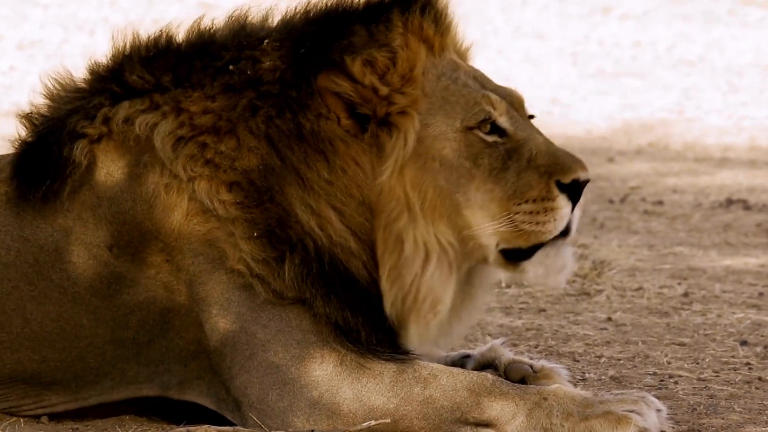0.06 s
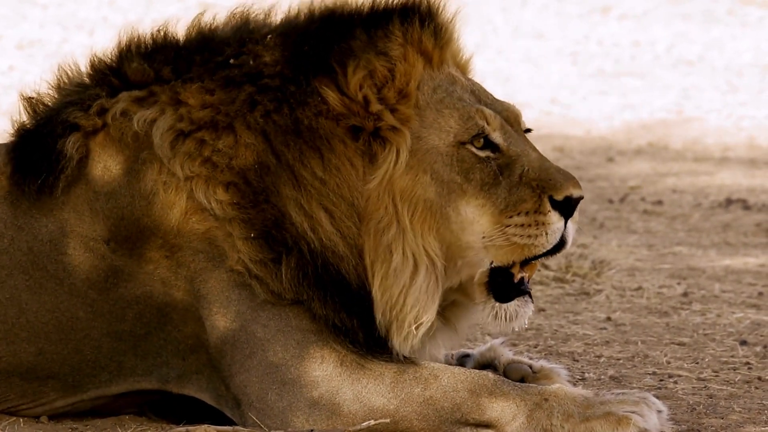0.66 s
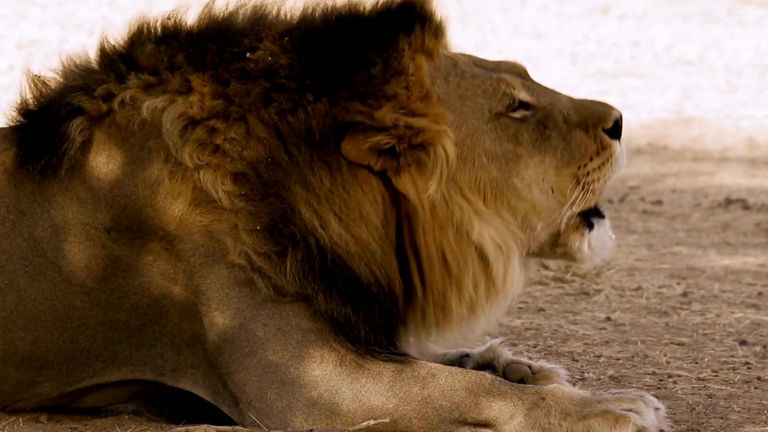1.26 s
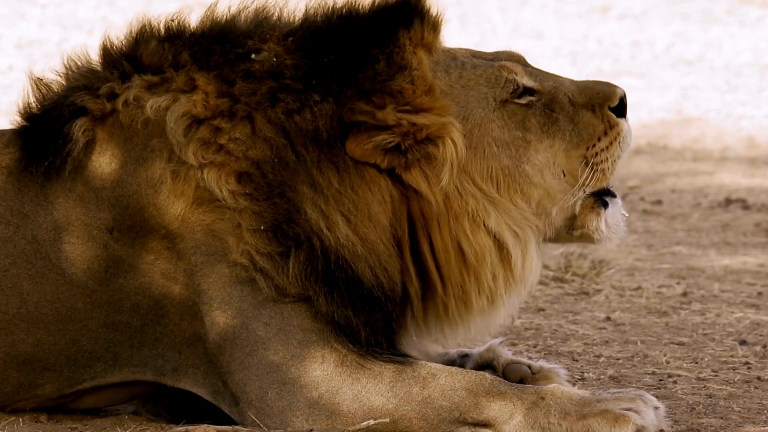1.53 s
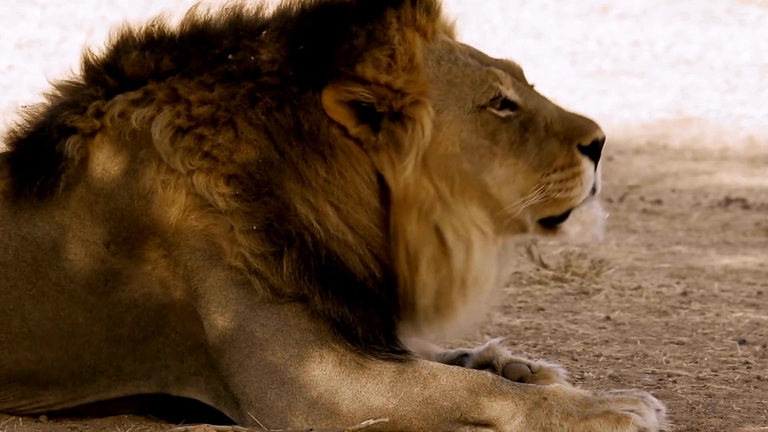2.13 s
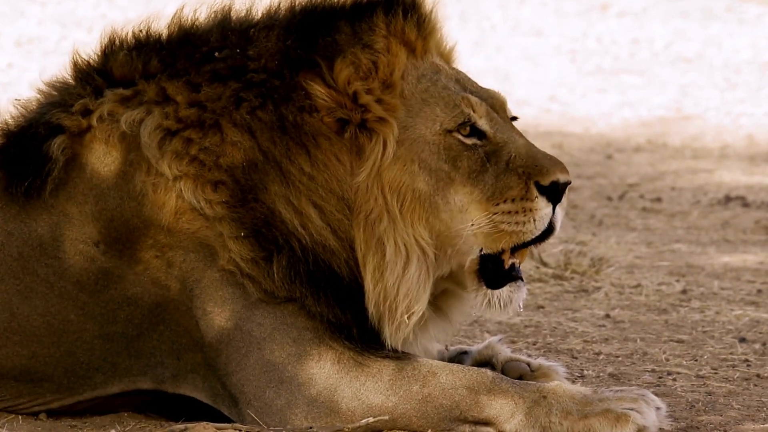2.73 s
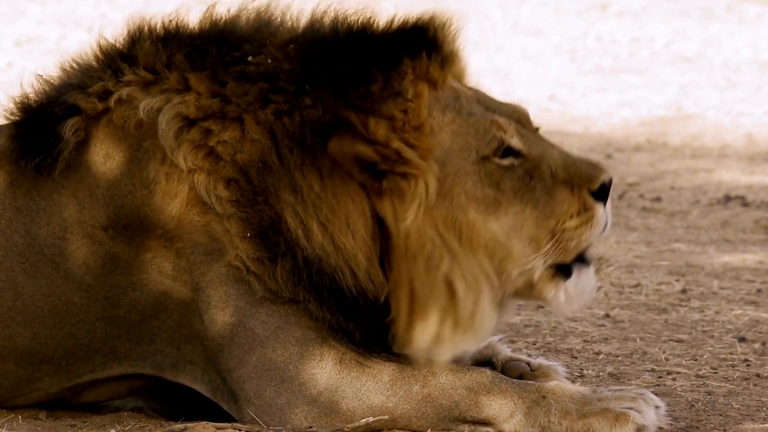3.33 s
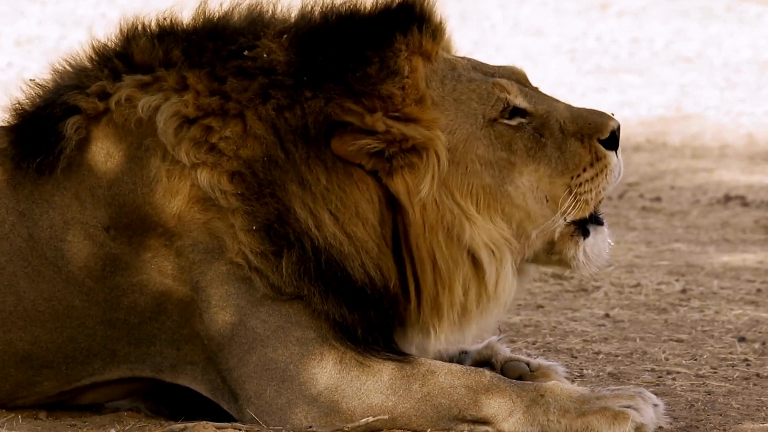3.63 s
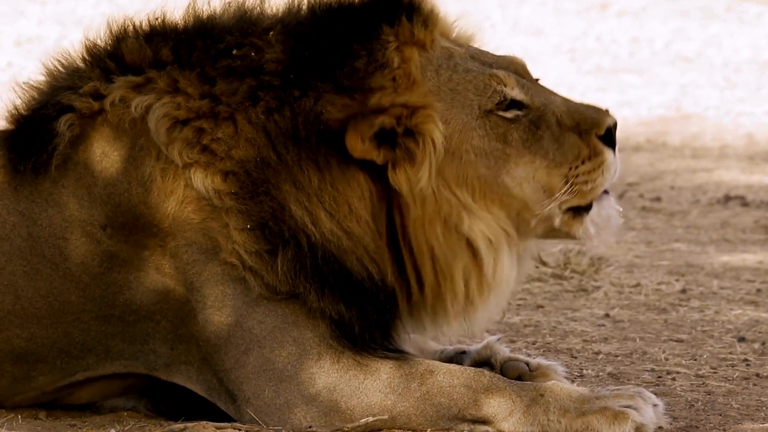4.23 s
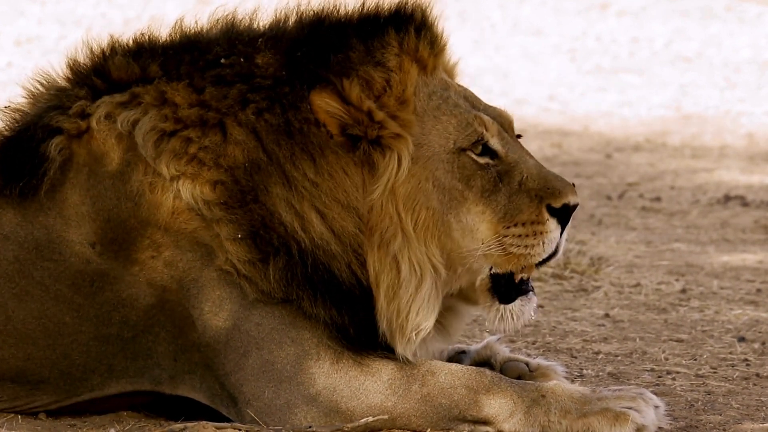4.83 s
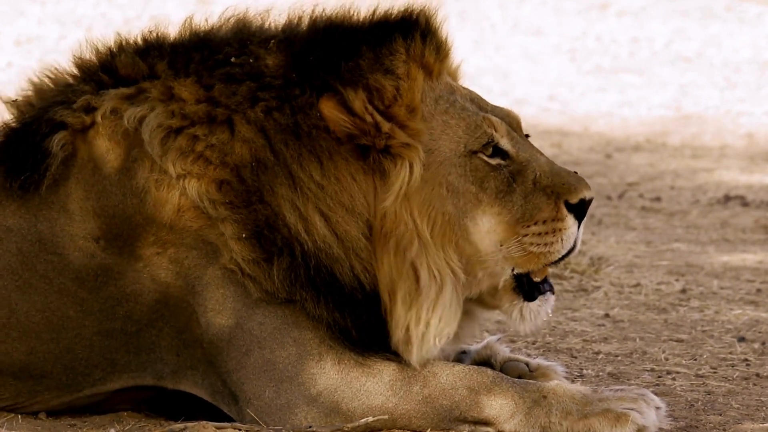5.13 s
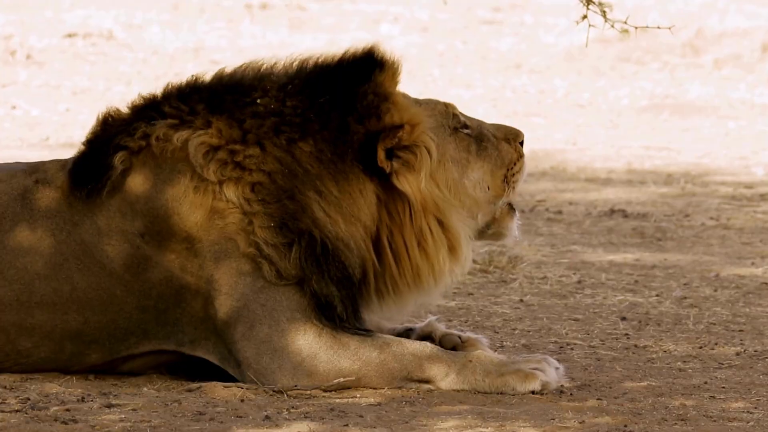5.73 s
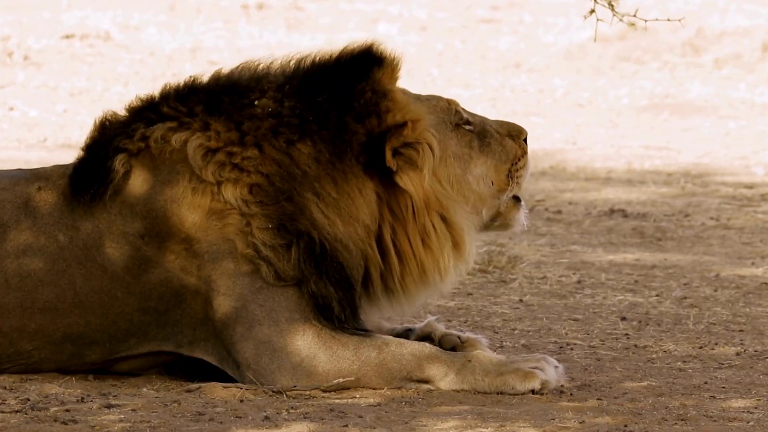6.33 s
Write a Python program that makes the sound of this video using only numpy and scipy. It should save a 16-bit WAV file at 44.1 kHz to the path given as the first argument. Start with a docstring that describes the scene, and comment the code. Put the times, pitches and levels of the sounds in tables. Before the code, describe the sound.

A steady hush of outdoor air with a low wind rumble runs throughout. From the start, songbirds slightly to the left whistle and twitter in short repeated syllables, echoing lightly among trees, while fainter birds call far off. At about 1 second a close, central lion gives a deep, moaning roar lasting a second: it starts clean, tightens, turns hoarse and sinks. A bird adds one quick rising trill at 2.5 seconds, then the song thins out. The second roar runs from 3.3 to 4.4 seconds, briefly cracking into a higher tone midway. Two soft, low thumps come at about 4.8 and 5.4 seconds, and the birds pick up again with quick chirps. The third roar, slightly lower, begins at 5.5 seconds and fades by about 6.5, with one short dry click just after it starts.

```python
"""Open ground among trees: a lying lion gives three deep, moaning roars over a steady hush of air.
Its heavy vocal folds pulse into a long throat; each roar starts clean, tightens, turns hoarse, sinks.
Songbirds whistle short repeated syllables and one rising trill; fainter birds call far off.
Leaves and trunks scatter the song. Two soft low thumps precede the last roar; a click falls within it."""
import sys
import numpy as np
from scipy import signal
from scipy.fft import rfft, irfft
from scipy.io import wavfile
from scipy.ndimage import uniform_filter1d

SR = 44100
rng = np.random.default_rng(int(sys.argv[2]) if len(sys.argv) > 2 else 0)


def log_audio(samples):
    """Write samples as a 16-bit WAV file to the path given in sys.argv[1]."""
    # one column per channel
    frames = np.atleast_2d(samples).T
    # limit to full scale, then quantise
    limited = np.clip(frames, -1, 1)
    pcm = np.round(limited * 32767).astype(np.int16)
    wavfile.write(sys.argv[1], SR, pcm)


N = 285768

# Air spectrum: freq_hz, level_db
AIR_SPECTRUM = [(15, -36), (25, -12), (48, 5), (126, -10), (305, -13), (509, -11), (567, -11.5), (722, -9),
                (945, -7), (2420, -22), (2700, -22), (3340, -23), (5140, -26.5), (8350, -35.5),
                (15500, -43)]
# Left-right likeness of the air: freq_hz, correlation
AIR_CORRELATION = [(60, 0.78), (240, 0.89), (950, 0.85), (3770, 0.58), (15000, 1)]
# Bird notes by shape: length_s, start_ratio, end_ratio (to the pitch a third in), swell_db, waver_ratio
NOTE_SHAPES = {"hook": (.088, 1.46, .91, -2, .012), "flick": (.02, 1.27, .92, 0, .012),
               "slide": (.028, 1.2, .77, -2, .012), "swoop": (.046, 1.44, .75, 0, .012),
               "lift": (.028, .85, 1.03, 7, .012), "rise": (.025, .85, 1.2, 2, .018),
               "arch": (.028, .74, .7, -5, .022), "pip": (.026, 1.06, .97, 0, .01),
               "dive": (.024, 1.42, .82, 1, .03), "climb": (.044, .84, 1.3, 2, .045),
               "buzz": (.036, 1, 1, -2, .065)}
# One syllable repeated: start_s, repeats, spacing_s, shape, ending, first_hz, last_hz, first_db, last_db
BIRD_PHRASES = [(0, 1, 0, "pip", "none", 2290, 2290, -20, -18.5),
                (.085, 2, .03, "pip", "none", 2350, 2345, -22, -20),
                (0.078, 2, 0.18, "rise", "none", 4070, 4510, -32.5, -32.5),
                (0.061, 2, .088, "pip", "none", 5800, 5650, -45, -35),
                (0.318, 3, 0.18, "lift", "twitter", 4100, 3860, -29, -23.5),
                (.375, 2, 0.13, "hook", "none", 2390, 2456, -20, -21.5),
                (.828, 2, .147, "hook", "none", 2458, 2480, -20, -20.5),
                (.839, 3, 0.14, "lift", "twitter", 3550, 3360, -23.5, -26),
                (1.232, 5, .04, "slide", "none", 3350, 3690, -27, -24.5),
                (1.345, 2, 0.14, "hook", "none", 2410, 2440, -20.5, -22),
                (1.504, 2, 0.16, "lift", "drop", 4270, 4090, -23, -23),
                (1.736, 1, 0, "hook", "none", 2240, 2250, -28, -38),
                (1.922, 2, .135, "dive", "upturn", 4910, 4470, -27, -28.5),
                (2.195, 2, .085, "rise", "scold", 5030, 4540, -30, -26),
                (2.39, 1, 0.35, "slide", "none", 2800, 3020, -32.5, -35),
                (3.945, 5, .042, "buzz", "none", 2390, 2780, -43, -47),
                (5.133, 2, 0.12, "slide", "none", 4600, 4800, -47, -41.5),
                (5.352, 7, 0.069, "arch", "chip", 4360, 3975, -36, -29),
                (5.779, 7, .045, "buzz", "none", 5850, 5650, -47, -51),
                (5.959, 2, 0.063, "slide", "none", 3500, 3210, -31, -28.5),
                (5.987, 1, 0, "climb", "none", 4030, 3950, -32, -33),
                (6.113, 3, 0.16, "swoop", "hiccup", 4200, 4080, -27, -23.5)]
# Notes after a syllable's lead note, by ending: delay_s, shape, pitch_hz, relative_db
SYLLABLE_ENDINGS = {"none": [], "twitter": [(.033, "flick", 4480, 1), (.112, "buzz", 5580, -8.5),
                    (.107, "slide", 3950, -6.5)], "drop": [(.029, "swoop", 3220, 0.5)],
                    "upturn": [(.034, "climb", 2750, 3)], "scold": [(.004, "buzz", 5360, -2),
                    (.017, "dive", 4824, 3)], "chip": [(.071, "flick", 4970, -6.5)],
                    "hiccup": [(.103, "slide", 4400, -2), (.119, "lift", 4870, -4)]}
# Rising trill: time_s, pitch_hz, level_db
TRILL_COURSE = [(2.475, 1896, -36.5), (2.51, 2750, -26), (2.544, 3476, -24), (2.6, 3926, -22.5),
                (2.648, 4070, -27), (2.66, 4100, -47)]
# Echo decay in the trees: freq_hz, t60_s
TREE_DECAY = [(2500, 2.26), (4000, 1.26), (6000, 1.35), (13000, .7)]
# Scattering by leaves: freq_hz, gain_db
LEAF_SCATTER = [(2200, -4), (3200, 2.5), (5000, -1), (11000, 1.5)]
# Roars: start_s, slack_s, end_s, top_hz, max_roughness, level_db, swell_db, tight_at_s, tight_s, loss_db
LION_ROARS = [(1.061, 1.697, 2.036, 160.2, 0.62, -13.5, 10.5, 1.55, 0.12, 13),
              (3.335, 3.982, 4.356, 159, 0.61, -13, 9.5, 3.79, 0.085, 27.5),
              (5.543, 6.258, 6.54, 138.5, 0.57, -12.5, 6, 5.945, 0.034, 8)]
# Surges of effort: centre_s, half_width_s, throat_db, added_roughness
EFFORT_SURGES = [(1.577, 0.011, 7, .03), (1.738, 0.028, 1.5, .04), (3.663, 0.016, 10, 0),
                 (3.879, .035, 3, 0.01), (4.012, 0.036, 2.5, .05), (4.289, 0.021, 5.5, 0),
                 (5.818, 0.019, 10.5, 0.05), (5.977, 0.022, 8, 0), (6.302, .04, 4.5, .3)]
# Valley below the first throat resonance: freq_hz, gain_db
THROAT_VALLEY = [(180, -13), (235, 6.5), (305, -5), (365, 2)]
# Throat resonances: centre_hz, width_hz, gain_db
THROAT_MODES = [(383.4, 94, 8), (494.3, 64, -5), (674, 64, -11.5), (766, 62, -14.5), (920, 94, -13.5),
                (1148, 28, -21.5)]
# Breath rasp spectrum: freq_hz, gain_db
RASP_SPECTRUM = [(200, -72), (700, -47), (1400, -28.5), (2000, -27), (3400, -29.5), (5000, -41),
                 (9000, -45), (10500, -72)]
# Second roar cracking into a higher register: time_s, pitch_hz, voice_share
CRACK_COURSE = [(3.695, 266, 0), (3.73, 265.6, 0.34), (3.8, 263, 0.55), (3.84, 260, 0.76), (3.86, 243, 0)]
# Cracked voice spectrum: harmonic, level_db
CRACK_HARMONICS = [(1, 9), (2, 8.5), (3, 9.5), (4, 5.5), (5, -28)]
# Low thumps: start_s, length_s, level_db
LOW_THUMPS = [(4.834, .11, -35), (5.36, .13, -36)]


def amp(db):
    """Decibels to gain."""
    return 10 ** (np.asarray(db) / 20)


def unit_rms(x):
    """Scales x to rms 1."""
    return x / np.sqrt(np.mean(x ** 2) + 1e-20)


def steady(x, span_s):
    """Holds short-time rms at 1."""
    size = int(span_s * SR)
    power = uniform_filter1d(uniform_filter1d(x ** 2, size), size)
    return x / np.sqrt(abs(power) + 1e-12)


def at_freq(table, hz):
    """Interpolates a table over log frequency."""
    freq_hz, value = np.transpose(table)
    return np.interp(np.log(hz + 1), np.log(freq_hz + 1), value)


def at_time(table, t):
    """Interpolates each column over time."""
    time_s, *columns = np.transpose(table)
    return [np.interp(t, time_s, column) for column in columns]


def colour(x, spectrum):
    """Filters x by a dB spectrum."""
    return irfft(rfft(x) * amp(at_freq(spectrum, np.fft.rfftfreq(len(x), 1 / SR))), len(x))


def wander(count, rate_hz):
    """Smooth random drift, rms about 1."""
    padded = count + SR // 4
    lowpass = np.exp(-(np.fft.rfftfreq(padded, 1 / SR) / rate_hz) ** 2)
    return unit_rms(irfft(rfft(rng.standard_normal(padded)) * lowpass))[:count]


def resonate(x, centre_hz, width_hz):
    """Unity-gain resonance, two equal pole pairs."""
    radius = np.exp(-np.pi * width_hz / SR)
    pole = radius * np.exp(2j * np.pi * centre_hz / SR)
    return 2 * signal.lfilter([(1 - radius) ** 2], [1, -2 * pole, pole ** 2], x).real


def ramp(t, start_s, length_s):
    """Linear rise, 0 to 1."""
    return np.clip((t - start_s) / length_s, 0, 1)


def bump(t, centre_s, half_width_s):
    """Gaussian of height 1."""
    return np.exp(-((t - centre_s) / half_width_s) ** 2)


def add(mix, start_s, sound):
    """Mixes sound in at start_s."""
    part = mix[round(start_s * SR):][:len(sound)]
    part += sound[:len(part)]


def pan(x, left_db):
    """Stereo, left louder by left_db."""
    return x * amp([[left_db / 2], [-left_db / 2]])


def open_air(level_db=-37.5):
    """Soft hush over low wind rumble, mostly alike in both ears."""
    left, other = rfft(rng.standard_normal((2, N)))
    alike = at_freq(AIR_CORRELATION, np.fft.rfftfreq(N, 1 / SR))
    right = alike * left + np.sqrt(1 - alike ** 2) * other
    hush = np.array([colour(irfft(side, N), AIR_SPECTRUM) for side in (left, right)])
    return amp(level_db + .35 * wander(N, rate_hz=4)) * unit_rms(hush)


def whistle(hz, octave_db=-42, third_db=-28, band_hz=12000, width_hz=1900):
    """Near-pure bird tone: faint octave, third harmonic in one high band only."""
    phase = 2 * np.pi * np.cumsum(hz) / SR
    third = amp(third_db) * np.exp(-((3 * hz - band_hz) / width_hz) ** 2)
    return np.sqrt(2) * (np.sin(phase) + amp(octave_db) * np.sin(2 * phase) + third * np.sin(3 * phase))


def chirp(shape, hz):
    """One wavering note: the pitch sweeps fast, then levels out."""
    length_s, start_ratio, end_ratio, swell_db, waver = NOTE_SHAPES[shape]
    count = int(length_s * SR)
    bend = np.polyfit(np.log1p([0, 2, 6]), np.log([start_ratio, 1, end_ratio]), 2)
    glide = np.exp(np.polyval(bend, np.log1p(np.linspace(0, 6, count))))
    envelope = amp(swell_db * np.linspace(-.5, .5, count)) * signal.windows.tukey(count, .26)
    return envelope * whistle(hz * glide * (1 + waver * wander(count, rate_hz=580)))


def songbirds(pitch_spread=.0079, spread_db=.7):
    """Evenly repeated syllables drifting in pitch and level; no two notes alike."""
    song = np.zeros(N)
    for start_s, repeats, spacing_s, lead, ending, first_hz, last_hz, first_db, last_db in BIRD_PHRASES:
        syllables = np.linspace((first_hz, first_db), (last_hz, last_db), repeats)
        for k, (lead_hz, lead_db) in enumerate(syllables):
            for delay_s, shape, hz, db in [(0, lead, lead_hz, .024)] + SYLLABLE_ENDINGS[ending]:
                detune, accent = rng.standard_normal(2)
                note = chirp(shape, hz * (1 + pitch_spread * detune))
                gain = amp(lead_db + db + spread_db * accent)
                add(song, start_s + k * spacing_s + delay_s, gain * note)
    return song


def far_birds(count=56, centre_hz=4300, floor_db=-40.5, range_db=6):
    """Faint notes at random times and pitches."""
    song = np.zeros(N)
    for k, (when, pick, height, loud) in enumerate(rng.random((count, 4))):
        shape = ["slide", "rise", "arch", "flick"][int(4 * pick)]
        note = chirp(shape, centre_hz * 2 ** (height - .5))
        add(song, (k + when) / count * N / SR, amp(floor_db + range_db * loud) * note)
    return song


def tree_echoes(song, near_s=.027, near_db=-4.5, tail_db=-4, width=.35):
    """Leaves and trunks scatter song into random-phase echoes: near ones, then a thin tail."""
    hz, t, spectra = signal.stft(song, SR, nperseg=512, noverlap=384)
    lag_s = t[None, :400]
    near = np.exp(-lag_s / near_s) * (lag_s > t[1])
    tail = amp(-60 * lag_s / at_freq(TREE_DECAY, hz)[:, None]) ** 2 * (lag_s > t[3])
    echoes = amp(near_db) ** 2 * near / near.sum() + amp(tail_db) ** 2 * tail / tail.sum(1, keepdims=True)
    power = abs(signal.fftconvolve(abs(spectra) ** 2, echoes, axes=1)[:, :len(t)])
    magnitude = np.sqrt(power) * amp(at_freq(LEAF_SCATTER, hz)[:, None])
    phases = np.exp(2j * np.pi * rng.random((2, *power.shape)))
    mid, side = 2 * signal.istft(magnitude * phases, SR, nperseg=512, noverlap=384)[1][:, :N]
    return np.array([mid + width * side, mid - width * side])


def effort(t, start_s, slack_s, end_s, top_hz, max_roughness, level_db, swell_db,
           tight_at_s, tight_s, loss_db):
    """One roar's course: pitch climbs and holds, then sinks and fades as the folds slacken."""
    start_hz, rise_hz_per_s, end_hz, min_roughness = 120.36, 140, 100.7, .227
    slack = ramp(t, slack_s, end_s - slack_s)
    hoarse = ramp(t, start_s + .15, length_s=.3654)
    accent = bump(t, start_s + .044, half_width_s=.11)  # louder, rougher, brighter opening
    surge_db = sum(db * bump(t, at_s, half_s) for at_s, half_s, db, _ in EFFORT_SURGES)
    surge_rough = sum(added * bump(t, at_s, half_s) for at_s, half_s, _, added in EFFORT_SURGES)
    rough = min_roughness + (max_roughness - min_roughness) * hoarse + surge_rough + .071 * accent

    taut_hz = np.minimum(start_hz + rise_hz_per_s * (t - start_s), top_hz)
    hz = taut_hz * (1 - slack) + end_hz * slack + 24.7 * surge_rough
    hz *= 1 + .014 * wander(len(t), rate_hz=14)
    flow = ramp(t, start_s, length_s=.07) ** 1.6 * (1 - ramp(t, end_s - .013, length_s=.013))
    flow *= amp(3 * np.sqrt(slack) * wander(len(t), rate_hz=48))  # breath falters

    # hoarseness, surges and tightening choke the chest tone
    chest_db = level_db - 3.5 * hoarse - 14 * surge_rough - loss_db * bump(t, tight_at_s, tight_s)
    chest_gain = flow * amp(chest_db - 19 * slack ** 1.54)
    push_db = swell_db * hoarse + surge_db
    throat_db = -27 + push_db + 11.5 * accent - 26.5 * slack ** 2.65
    throat_gain = flow * amp(throat_db) * ramp(t, start_s + .03, length_s=.03)  # opens after the chest
    focus_db = push_db * (1 - 2 * slack) - 23.5 * accent
    return hz, np.clip(rough, 0, 1), chest_gain, throat_gain, focus_db


def vocal_folds(hz, rough, jitter=.12, shimmer=.44, hollow_below_hz=142):
    """Heavy folds flap less evenly with roughness; air bursts through once a cycle."""
    count = len(hz)
    cycles = np.cumsum(hz * (1 + jitter * rough * wander(count, rate_hz=70))) / SR
    phase = 2 * np.pi * cycles
    strength = np.exp(shimmer * rough * wander(count, rate_hz=61))
    even_gain = 1 + .97 * np.tanh((hz - hollow_below_hz) / 8)  # slack folds swing symmetrically
    pulses = sum(np.cos(k * phase) * k ** .59 * (1 if k % 2 else even_gain) for k in range(1, 11))
    bursts = 1.6 + np.exp(-(cycles % 1) / .06)
    breath = unit_rms(bursts * strength * rng.standard_normal(count))
    drive = (1 - rough) * unit_rms(pulses) * strength + 3 * rough ** 1.5 * breath
    return phase, breath, drive


def chest(phase, breath, rough, octave_db=-27):
    """The lowest resonance carries the fundamental, which breaks up into a growl."""
    tone = np.sqrt(2) * (np.cos(phase) + amp(octave_db) * np.cos(2 * phase))
    growl = unit_rms(resonate(breath, centre_hz=158, width_hz=75))
    return steady((1 - rough ** 2) * tone + .79 * rough ** 2 * growl, span_s=.16)


def throat(drive, focus_db, ring_hz=405.6, full_focus_db=14.5):
    """A long throat rings; at full focus its first resonance sings as a tone of its own."""
    drive = colour(drive, THROAT_VALLEY)
    first, *higher = [amp(db) * resonate(drive, hz, width_hz) for hz, width_hz, db in THROAT_MODES]
    voice = steady(amp(-3 + .13 * focus_db) * first + sum(higher), span_s=.014)
    sung = .94 * np.clip(focus_db / full_focus_db, 0, 1) ** 2
    phase = 2 * np.pi * np.cumsum(ring_hz * (1 + .022 * wander(len(drive), rate_hz=37))) / SR
    return np.sqrt(1 - sung) * voice + np.sqrt(2 * sung) * np.sin(phase)


def roar(row, length_s=1.12, rasp_db=15):
    """Fold pulses ring chest and throat; breath adds rasp."""
    t = row[0] + np.arange(0, length_s, 1 / SR)
    hz, rough, chest_gain, throat_gain, focus_db = effort(t, *row)
    phase, breath, drive = vocal_folds(hz, rough)
    voice = throat(drive, focus_db)
    crack, share = voice_crack(t)
    rasp = amp(rasp_db) * colour(breath, RASP_SPECTRUM) * np.sqrt(rough + 2 * share)
    upper = (1 - share) * voice + np.sqrt(share) * crack + rasp
    return chest_gain * chest(phase, breath, rough) + throat_gain * upper


def trill(rate_hz=78, pitch_depth=.052, level_depth=.47):
    """A rising whistle that throbs in pitch and level."""
    t = np.arange(TRILL_COURSE[0][0], TRILL_COURSE[-1][0], 1 / SR)
    hz, db = at_time(TRILL_COURSE, t)
    throb = np.sin(2 * np.pi * rate_hz * t)
    hz *= 1 + pitch_depth * throb + .0087 * wander(len(t), rate_hz=710)
    song = np.zeros(N)
    add(song, t[0], amp(db) * (1 + level_depth * throb) * whistle(hz))
    return song


def voice_crack(t, level_db=-2):
    """A second, faster vibration takes over the roar; returns tone and voice share."""
    hz, share = at_time(CRACK_COURSE, t)
    phase = 2 * np.pi * np.cumsum(hz * (1 + .0027 * wander(len(t), rate_hz=50))) / SR
    tone = unit_rms(sum(amp(db) * np.cos(k * phase) for k, db in CRACK_HARMONICS))
    return amp(level_db) * tone, np.clip(share, 0, 1)


def thumps():
    """Two dull pushes of low noise."""
    out = np.zeros(N)
    for start_s, length_s, level_db in LOW_THUMPS:
        count = int(length_s * SR)
        body = resonate(rng.standard_normal(2 * count), centre_hz=85, width_hz=130)[count:]
        add(out, start_s, amp(level_db) * unit_rms(body) * signal.windows.tukey(count, .7))
    return out


def click(start_s=5.6545, level_db=-10, decay_s=.0006, cutoff_hz=9500):
    """One short dry click."""
    pulse = np.exp(-np.arange(SR // 50) / SR / decay_s)
    lowpass = signal.butter(8, cutoff_hz, fs=SR, output="sos")
    out = np.zeros(N)
    add(out, start_s, amp(level_db) * signal.sosfilt(lowpass, pulse))
    return out


def scene():
    """Lion close and central; birds slightly left, among the trees."""
    lion = np.zeros(N)
    for row in LION_ROARS:
        add(lion, row[0], roar(row))
    song = songbirds() + trill()
    far = far_birds()
    far = amp(-8) * (far / 2 + tree_echoes(far))  # mostly echoes
    birds = pan(song + far + tree_echoes(song), left_db=2)
    return amp(.5) * lion + birds + thumps() + click() + pan(open_air(), left_db=2.5)


def record(dry, cutoff_hz=15700):
    """Low-pass band limit."""
    lowpass = signal.firwin(511, cutoff_hz, window=("kaiser", 9), fs=SR)
    return signal.oaconvolve(dry, lowpass[None], "same")


dry = scene()
out = record(dry)
log_audio(out)
```